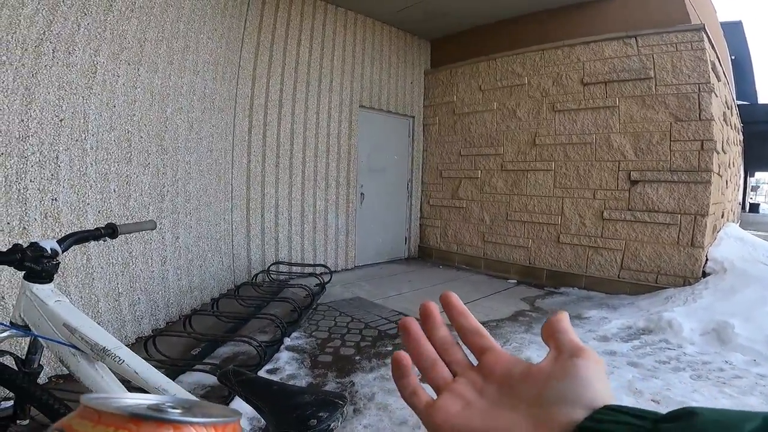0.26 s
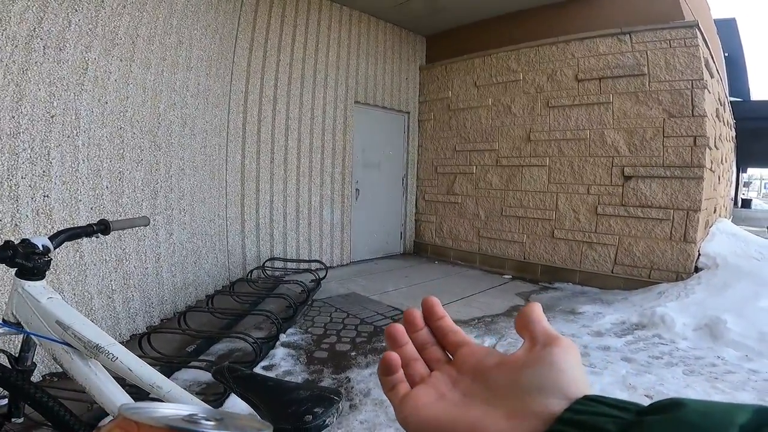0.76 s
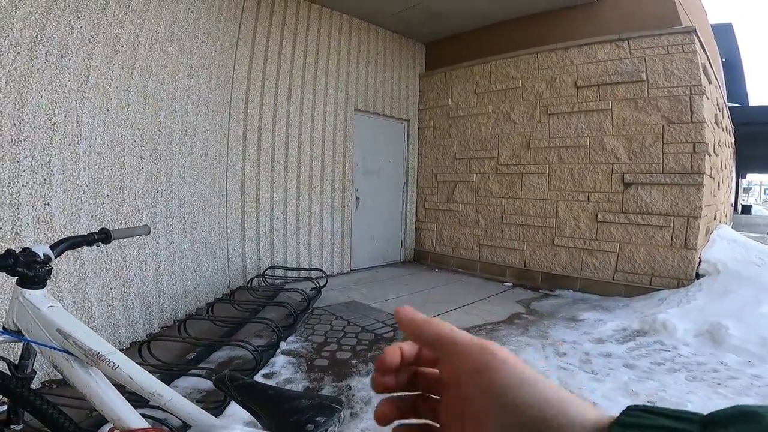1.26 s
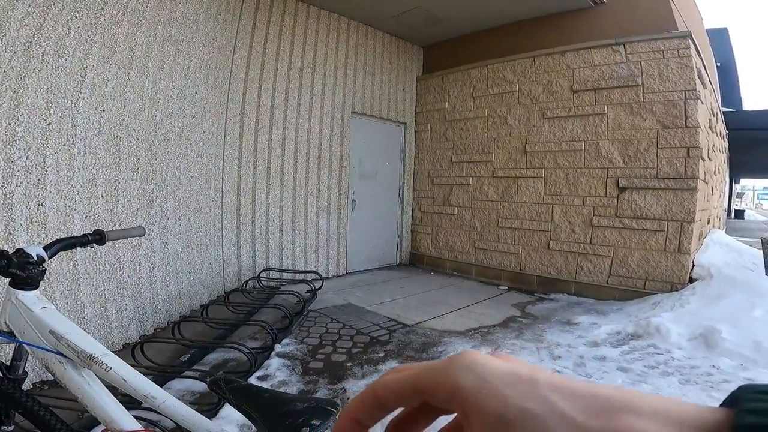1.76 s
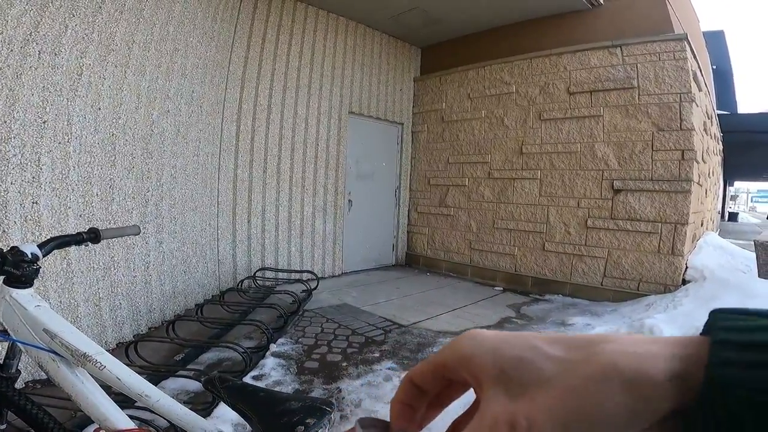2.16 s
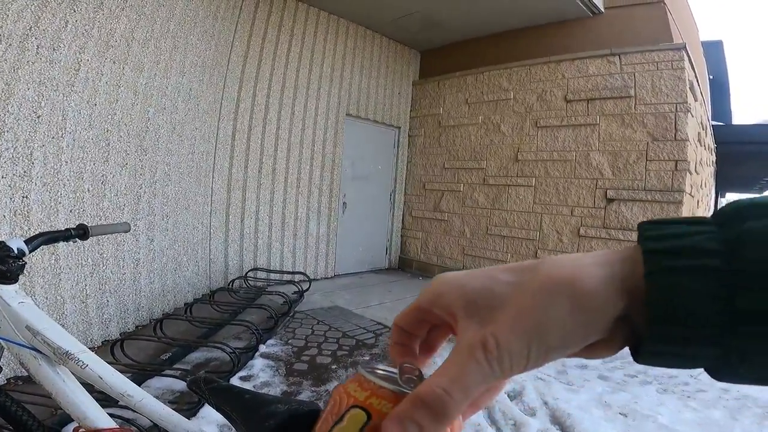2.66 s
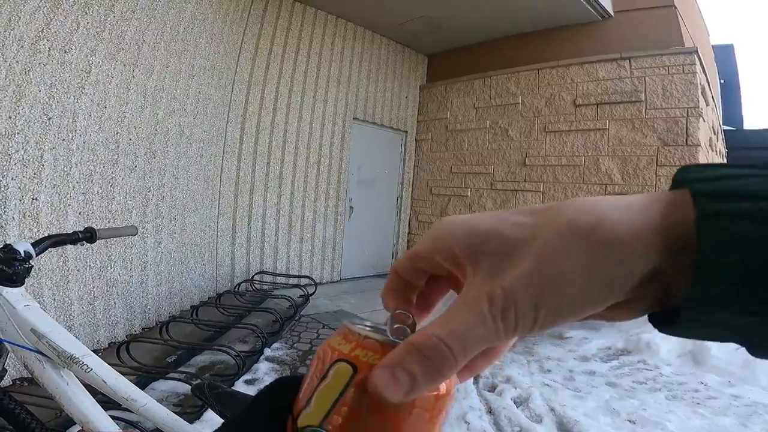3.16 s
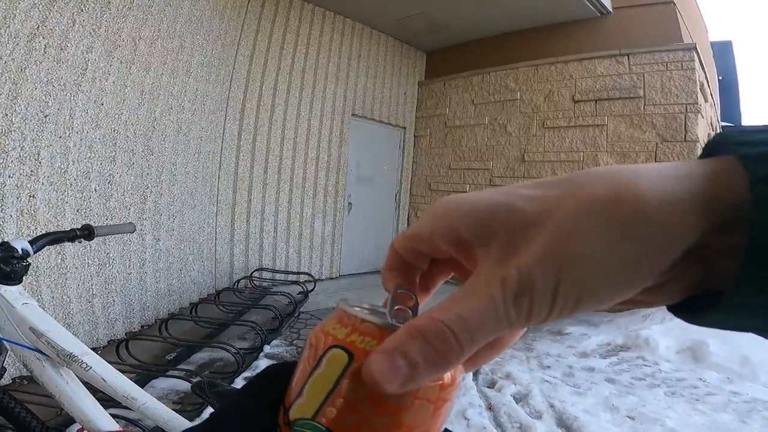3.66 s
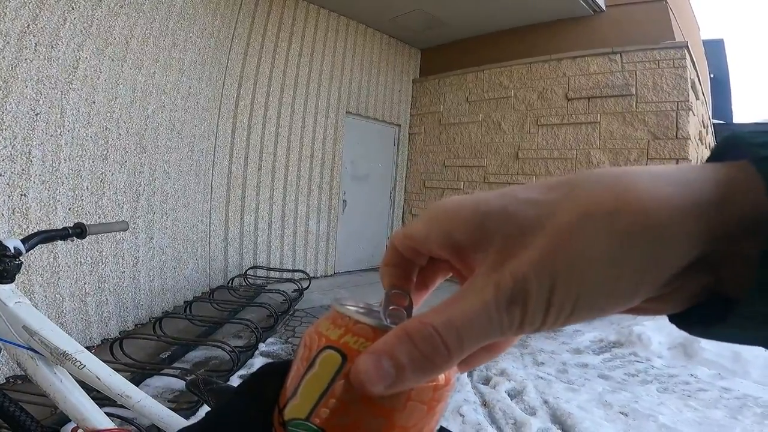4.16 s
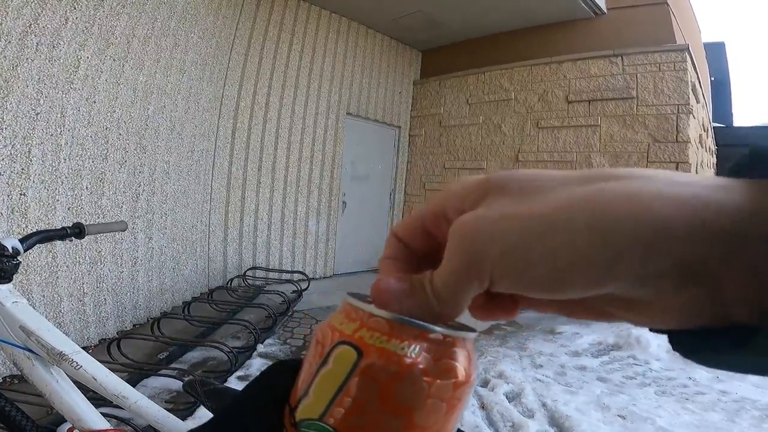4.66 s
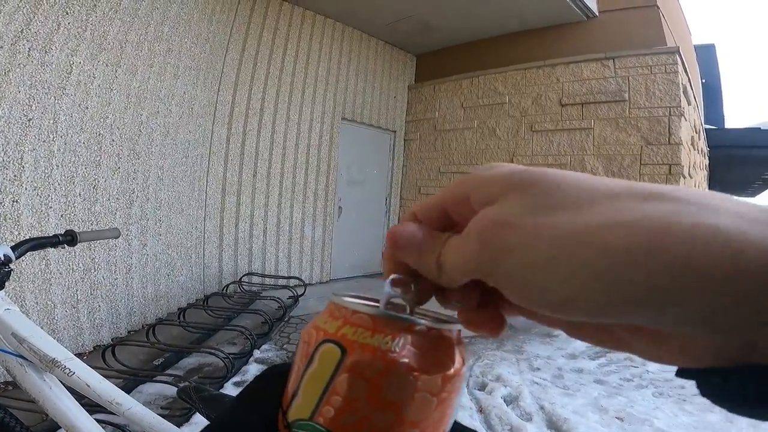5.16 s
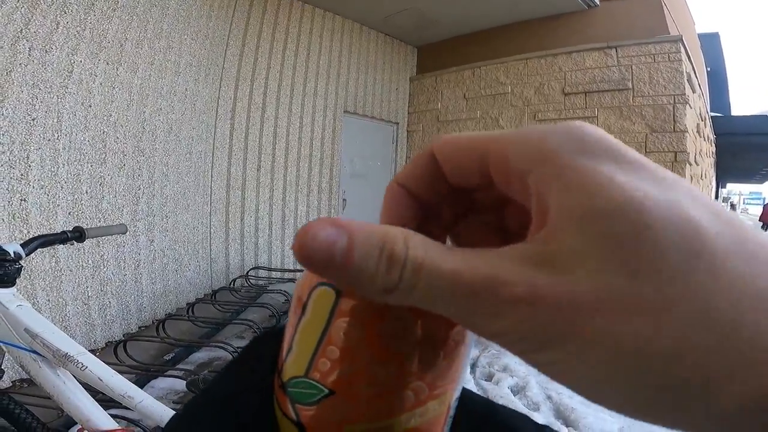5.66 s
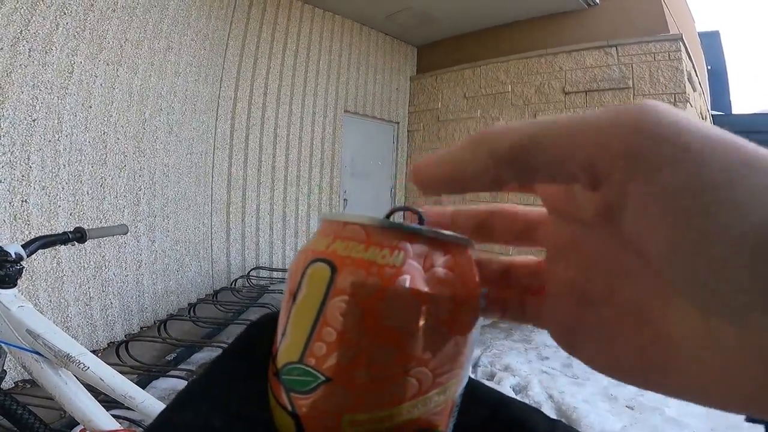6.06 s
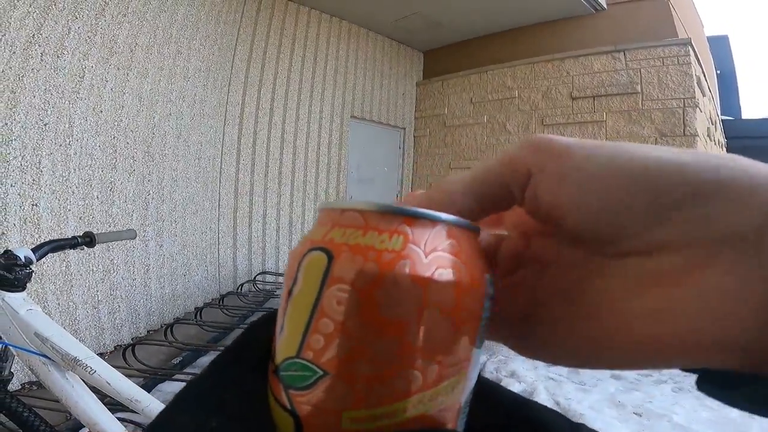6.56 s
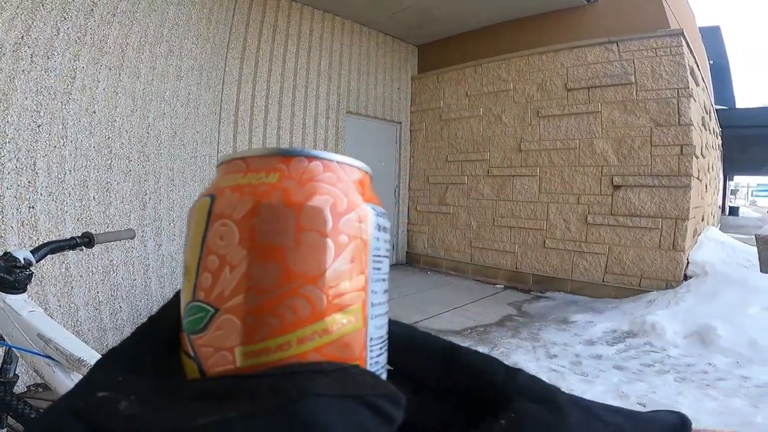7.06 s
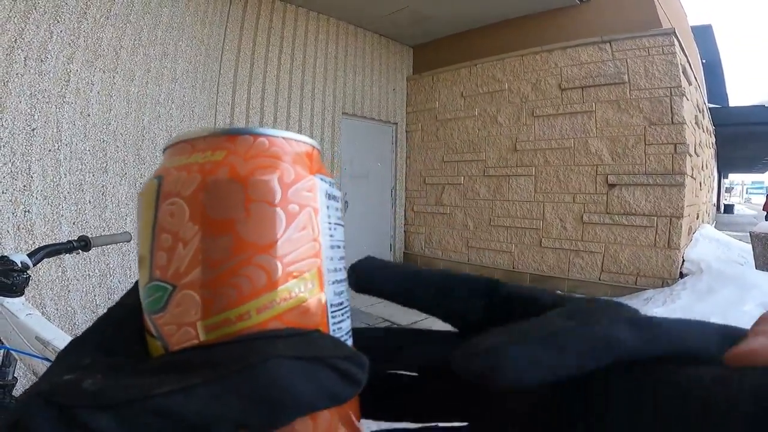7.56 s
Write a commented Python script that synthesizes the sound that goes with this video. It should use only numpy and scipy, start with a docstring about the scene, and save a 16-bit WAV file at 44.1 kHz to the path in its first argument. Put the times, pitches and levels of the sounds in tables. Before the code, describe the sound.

Close metallic tab snaps on a drink can, a sharp gas spit and cracks, then a loud pop, short fizz and small plinks outdoors.

```python
"""Opening a drink can outdoors

A fingernail snaps the tab of a can close to the microphone; knocks on its housing are heard too.
Gas spits out as noise, the score line cracks, and the lid tears open with a pop: ringing metal modes.
Foam fizzes as tiny bubbles, then the tab is bent back and rings the air space and the loosened lid.
Behind are wind rumble, town noise and a motor's hum, a thin far squeal, rustling cloth and wall echoes."""
import sys
import numpy as np
from scipy import signal
from scipy.fft import rfft, irfft
from scipy.io import wavfile

SR = 44100
rng = np.random.default_rng(int(sys.argv[2]) if len(sys.argv) > 2 else 0)


def wrap_up_sound(samples):
    """Save the sound to the file named by the first command line argument, as 16-bit audio."""
    columns = np.atleast_2d(samples).T
    # keep every value between -1 and 1, then stretch to whole-number steps
    tamed = np.clip(columns, -1, 1)
    steps = np.round(tamed * 32767).astype(np.int16)
    wavfile.write(sys.argv[1], SR, steps)


N = 343980
TIME = np.arange(N) / SR   # the whole scene, s
HIT_TIME = np.arange(SR // 4) / SR   # one short hit, s


def from_db(db):
    """Turn decibels into gain."""
    return 10 ** (np.asarray(db) / 20)


def rms_one(x):
    """Scale to unit power."""
    return x / np.sqrt(np.mean(x ** 2) + 1e-20)


def unit_hit(x):
    """Scale a hit to the energy of ten milliseconds at unit power."""
    return x / np.sqrt(np.sum(x ** 2) / (SR / 100) + 1e-20)


def level(rows):
    """Make a gain curve from rows that start with t/s and end with level/dB."""
    rows = np.array(rows)
    return from_db(np.interp(TIME, rows[:, 0], rows[:, -1]))


def cut(x, hz, kind, order=2):
    """Filter away what lies above ("low") or below ("high") a pitch."""
    sos = signal.butter(order, min(hz, .45 * SR), kind, fs=SR, output="sos")
    return signal.sosfilt(sos, x)


def smooth(x, s):
    """Follow a signal sluggishly, with a time constant in seconds."""
    r = np.exp(-1 / (s * SR))
    return signal.lfilter([1 - r], [1, -r], x)


def drift(rate, size=N):
    """Wander at random through `rate` new values a second, with unit power."""
    knots = rng.standard_normal(int(size / SR * rate) + 2)
    return rms_one(np.interp(TIME[:size] * rate, np.arange(len(knots)), knots))


def noise(colour, side_db):
    """Make stereo noise with the given spectrum and its own left-right difference (side) part."""
    hz, db = np.transpose(colour)
    log_hz = np.log(np.fft.rfftfreq(N, 1 / SR) + 0.0014)
    # the spectrum falls steeply outside its table
    beyond = np.maximum(np.log(hz[0]) - log_hz, 0) + np.maximum(log_hz - np.log(hz[-1]), 0)
    gain = from_db(np.interp(log_hz, np.log(hz), db) - 40 * beyond)
    mid, side = irfft(rfft(rng.standard_normal((2, N))) * gain, N)
    return rms_one(mid + from_db(side_db) * side * [[1], [-1]])


def narrow_band(hz, width_hz):
    """Make a breathy tone: noise gathered around a pitch that may move."""
    phase = 2 * np.pi * np.cumsum(hz * np.ones(N)) / SR
    return rms_one(drift(width_hz) * np.sin(phase) + drift(width_hz) * np.cos(phase))


def ringing(modes, tilt_db=0, pitch=1, length=1, scatter_db=0, detune=0):
    """Add dying tones of alternating sign; strengths (tilted per octave) and pitches may vary by chance."""
    out = 0
    for k, (hz, db, t60) in enumerate(modes):
        strength_db = db + tilt_db * np.log2(hz / modes[0][0]) + scatter_db * rng.standard_normal()
        phase = 2 * np.pi * hz * pitch * (1 + detune * rng.standard_normal()) * HIT_TIME
        gain = from_db(strength_db - 60 * HIT_TIME / (t60 * length))
        out = out + (-1) ** k * gain * np.sin(phase)
    return unit_hit(out)


def crack(t60, low_hz, high_hz):
    """Make the brief rattle of a contact: dying noise between two pitches."""
    rattle = rng.standard_normal(len(HIT_TIME)) * from_db(-60 * HIT_TIME / t60)
    return unit_hit(cut(cut(rattle, low_hz, "high"), high_hz, "low"))


def grains(per_s, spread_db):
    """Scatter random clicks of uneven size and sign."""
    sizes = from_db(spread_db * np.minimum(rng.exponential(1, N), 4)) * rng.choice([-1, 1], N)
    return sizes * (rng.random(N) < per_s / SR)


def add(out, s, hit, db, pan_db=0):
    """Place a hit in stereo; a positive pan makes the left louder."""
    i = round(s * SR)
    out[:, i:i + len(hit)] += from_db([[db + pan_db / 2], [db - pan_db / 2]]) * hit[:N - i]


def burst(s, db, hold_s, rise_db_per_s, fall_db_per_s):
    """Make a gain that rises to its level at s, holds and dies away."""
    early = np.maximum(s - TIME, 0)
    late = np.maximum(TIME - s - hold_s, 0)
    return from_db(np.maximum(db - rise_db_per_s * early - fall_db_per_s * late, -200))


def swells(rows):
    """Make the gain of smooth bell-shaped movements, added in power."""
    power = 0
    for s, db, half_s in rows:
        power = power + from_db(db) ** 2 * np.exp(-2 * np.minimum(((TIME - s) / half_s) ** 2, 20))
    return np.sqrt(power)


WALL_T60_S, WALL_DB = .55, -27.5   # dying time and level of the can's wall echoes


def walls(x, gap_s=0.0088, build_s=0.0075, dull_hz=8000, side_db=-6):
    """Scattered echoes build up between the walls; their treble dies first."""
    t = np.arange(SR) / SR
    mid, side = rng.standard_normal((2, SR))
    echoes = mid + from_db(side_db) * side * [[1], [-1]]
    swell = 1 - np.exp(-np.maximum(t - gap_s, 0) / build_s)
    dying = from_db(-60 * t / WALL_T60_S)
    bass = cut(echoes, dull_hz, "low", order=3)
    treble = .9 * np.sqrt(dying) * cut(echoes, dull_hz, "high", order=3)
    tail = swell * dying * (bass + treble)
    tail = tail / np.sqrt(np.sum(tail ** 2) / 2)
    return signal.fftconvolve(x[None], tail, axes=1)[:, :N]


# ground and nearest walls: (delay t/s, level/dB relative)
NEAR_ECHOES = [(.008, -24), (.019, -28.5), (.033, -26.5), (.042, -27.5)]


def near_echoes(x, smear_s=0.035, dull_hz=7500):
    """The ground and the nearest rough walls each return a slightly smeared copy."""
    response = np.zeros((2, N))
    for s, db in NEAR_ECHOES:
        scatter = crack(t60=smear_s, low_hz=800, high_hz=dull_hz)
        add(response, s, scatter / np.abs(rfft(scatter)).max() * 2, db)
    return signal.fftconvolve(x[None], response[:, :len(HIT_TIME)], axes=1)[:, :N]


# a distant motor swells and fades: (t/s, level/dB relative, only the change counts)
MOTOR_SWELL = [(0.0, -51.5), (0.46, -39), (0.93, -46.5), (1.19, -46.5), (1.63, -35.5), (2.35, -40.5),
               (3.3, -48.5), (3.67, -43), (3.89, -51), (5.8, -57), (6.02, -54), (6.3, -63), (7.43, -54),
               (7.8, -52)]


def motor_swell():
    """Tell how far the distant motor is below its loudest, in dB."""
    s, db = np.transpose(MOTOR_SWELL)
    return np.interp(TIME, s, db - db.max())


# steady tones of the motor: (f/Hz, level/dB relative to one another)
HUM_LINES = [(161.5, -38), (242.2, -54), (323.0, -58), (355.3, -56), (404.2, -52)]
HUM_DB, HUM_SWING = -32.5, 0.88   # strongest line at the motor's loudest; share of the swell it follows


def hum(waver_hz=0.9, flutter_db=1.0, lag_s=0.00012):
    """Motor tones waver on their way through the open air and reach the left first."""
    top_db = max(db for hz, db in HUM_LINES)
    lag = lag_s * np.array([[0], [1]])
    lines = 0
    for hz, db in HUM_LINES:
        phase = 2 * np.pi * (np.cumsum(hz + waver_hz * drift(9)) / SR - hz * lag)
        lines = lines + from_db(db - top_db + flutter_db * drift(7.8)) * np.sin(phase)
    return from_db(HUM_DB + HUM_SWING * motor_swell()) * lines


# strength of the breeze: (t/s, level/dB before the lift WIND_DB)
WIND = [(0.0, -38), (2.5, -42), (2.76, -39), (5.6, -42.5), (6.89, -42), (7.23, -36), (7.8, -39)]
# arm movements jostle the microphone: (t/s, level/dB, half length t/s)
JOSTLES = [(1.04, -34, 0.062), (2.2, -38.5, 0.24), (4.25, -30, .04), (5.05, -26, 0.063),
           (6.38, -31.5, 0.062), (6.57, -33.5, 0.039), (7.73, -35, .02)]
# spectrum of the rumble: (f/Hz, level/dB relative)
WIND_COLOUR = [(15, -12), (25, 0), (33, 3), (43, -2.5), (55, -8), (80, -6), (100, -12.5), (140, -14),
               (200, -25)]
WIND_DB, GUST_DB, GUSTS_PER_S = 3.5, 0.84, 5.3   # lift; size and rate of the random gusts


def wind():
    """Gusts and jostling shake the microphone into a low rumble of noise."""
    breeze = level(WIND) * from_db(WIND_DB + GUST_DB * drift(GUSTS_PER_S))
    return np.hypot(breeze, swells(JOSTLES)) * noise(WIND_COLOUR, side_db=-27.5)


# spectrum of the town: (f/Hz, level/dB relative)
TOWN_COLOUR = [(90, -14), (140, 2), (230, -2.5), (400, -5.5), (600, -18), (1000, -24.5), (2000, -28),
               (3500, -38.5), (7000, -49), (14000, -64)]
TOWN_DB, TOWN_SWING = -42, .12   # level at its loudest; its share of the motor's swell


def town():
    """A wash of noise follows the motor's swell a little; long waves reach both sides alike."""
    wash = from_db(TOWN_DB + TOWN_SWING * motor_swell()) * noise(TOWN_COLOUR, side_db=-7.0)
    mid = wash.mean(axis=0)
    return mid + cut(wash - mid, 500, "high", order=1)


# strokes of the sleeve and glove: (t/s, level/dB before a 3 dB lift, half length t/s)
SLEEVE = [(.02, -47.5, 0.11), (.4, -61, 0.33), (1.39, -55.5, 0.15), (2.1, -56, 0.51), (2.44, -50, 0.19),
          (3.1, -58.5, 0.36), (4.5, -65, 0.12), (4.85, -62.5, 0.19), (5.68, -57, 0.12), (5.88, -57, 0.071),
          (6.7, -61.5, 0.56), (7.46, -55.5, 0.068), (7.60, -49, 0.03), (7.75, -58, 0.49)]
# spectrum of the rubbing cloth: (f/Hz, level/dB relative)
SLEEVE_COLOUR = [(400, -2.5), (900, 4), (1800, 1.5), (3000, -2.5), (5000, -6.5), (7500, -11),
                 (10000, -20.5), (12200, -18.5), (15000, -31)]
SLEEVE_REST_DB = -67.5   # cloth stirring between strokes, before the same lift


def sleeve():
    """Cloth rubs nearby: noise swells with each stroke and flickers quickly."""
    strokes = np.hypot(from_db(SLEEVE_REST_DB), swells(SLEEVE))
    flicker = from_db(3 + 1.7 * drift(120))
    return strokes * noise(SLEEVE_COLOUR, side_db=0.0) * flicker


# a thin far squeal, one table a note: (t/s, f/Hz, level/dB before flutter and a 1.5 dB cut)
SQUEALS = [
    [(0.308, 4660, -72), (0.32, 4650, -55), (0.38, 4645, -50.5), (0.44, 4660, -50), (0.5, 4670, -54),
     (0.57, 4640, -72)],
    [(0.39, 4690, -58), (0.435, 4740, -45.5), (0.48, 4780, -39), (0.52, 4760, -47), (0.585, 4780, -48),
     (0.612, 4788, -41.5), (0.665, 4790, -41.5), (0.692, 4760, -54.5), (0.735, 4775, -48),
     (0.775, 4710, -62), (0.815, 4780, -52), (0.88, 4765, -60), (0.92, 4745, -70), (1.0, 4760, -80)],
    [(1.99, 5470, -63), (2.045, 5520, -64), (2.065, 5530, -54), (2.12, 5540, -60), (2.21, 5620, -62),
     (2.24, 5590, -74)],
]


def squeals(waver_hz=10, octave_db=-25, echo_db=-8):
    """Nearly pure, fluttering notes with a faint octave beat against their echoes as the pitch moves."""
    out = 0
    for note in SQUEALS:
        s, hz, db = np.transpose(note)
        phase = 2 * np.pi * np.cumsum(np.interp(TIME, s, hz) + waver_hz * drift(160)) / SR
        sounding = (TIME > s[0]) * (TIME < s[-1])
        loudness = level(note) * sounding * from_db(-1.5 + 2 * drift(70))
        out = out + loudness * (np.sin(phase) + from_db(octave_db) * np.sin(2 * phase))
    return out + from_db(echo_db) * walls(out)


# dull knocks on the microphone housing:
# (t/s, level/dB, left over right level/dB, softness cut-off f/Hz, tick level/dB relative)
THUMPS = [(0.391, -34.5, -12, 1300, -24), (0.9958, -31, 7, 945, -35), (3.678, -19.5, -12.5, 900, -27),
          (3.7626, -18.5, -13, 1010, -28), (4.252, -32.5, -1, 600, -30), (4.278, -32.5, -1, 400, -33),
          (4.9960, -18.5, 9, 260, -40), (7.732, -33, 0, 500, -36)]


def thumps(body_hz=100):
    """A soft pulse spreads in the housing, its lows arriving last."""
    r = np.exp(-2 * np.pi * body_hz / SR)
    pulse = -np.exp(-2 * np.pi * body_hz * HIT_TIME)
    for _ in range(3):   # each pass delays the lows more than the highs
        pulse = signal.lfilter([r, -1], [1, -r], pulse)
    out = np.zeros((2, N))
    for s, db, pan_db, soft_hz, tick_db in THUMPS:
        tick = crack(t60=0.006, low_hz=1300, high_hz=5500)
        hit = unit_hit(cut(pulse, soft_hz, "low")) + from_db(tick_db) * tick
        add(out, s, hit, db, pan_db)
    return out


# the tab slips off the nail onto the lid: (t/s, level/dB, brightness level/dB per octave,
# lid flex level/dB relative, flex f/Hz, crack level/dB relative, tab pitch as a factor)
TAB_SNAPS = [(1.768, -47.5, 5, -1, 1760, -5, 1.17), (2.2783, -44.5, -2, 8, 1995, -14, 1),
             (2.3765, -39, -13.5, -15, 2410, -20, 1.01), (2.4055, -39.5, -5, -28, 2400, -26, 1.06),
             (2.417, -40.5, -4, -24.5, 2403, -20, 1), (2.4278, -41.5, -3, -19.5, 2392, -18, 1.06),
             (2.45, -48, 0, -22, 2400, -14, 1.06), (2.552, -20.5, 4.5, -16, 2698, -14, 1.02),
             (3.0444, -14.5, -5, -7, 1743, -4, .98), (3.0515, -35, 6, -12, 1760, 0, 1.1)]
# the tab's own tones: (f/Hz, level/dB relative, time to fall 60 dB t/s)
TAB_MODES = [(3340, -8.5, 0.0058), (3760, 1, 0.0096), (4060, 3.5, 0.0073), (4445, 1.5, 0.009),
             (5300, -9, .004), (6250, -8, 0.0065), (8300, -27, .012), (10000, -19, 0.005),
             (12000, -19.5, .004)]
# the flexing lid, moved to the flex pitch above: (f/Hz, level/dB relative, time to fall 60 dB t/s)
FLEX_MODES = [(1830, 6.5, .008), (1340, 3, 0.004)]


def tab():
    """The finger-damped tab rings for a few cycles, flexes the lid and leaves the shell buzzing."""
    out = np.zeros((2, N))
    for s, db, tilt_db, flex_db, flex_hz, crack_db, pitch in TAB_SNAPS:
        metal = ringing(TAB_MODES, tilt_db, pitch)
        flex = ringing(FLEX_MODES, pitch=flex_hz / FLEX_MODES[0][0])
        # a short smoothing softens the blow
        hit = unit_hit(signal.lfilter(np.hanning(5), 1, metal + from_db(flex_db) * flex))
        hit = hit + from_db(crack_db) * crack(t60=0.0055, low_hz=3500, high_hz=8900)
        hit = hit + from_db(-15.5) * crack(t60=0.05, low_hz=2600, high_hz=6000)   # shell buzz
        add(out, s, unit_hit(hit), db)
    # the sound reaches the right side one sample later
    return np.array([out[0], np.roll(out[1], 1)])


# gas spits through the breaks in the seal: (t/s, level/dB, hold t/s)
GAS = [(2.696, -21.5, 0.075), (4.244, -46, .004), (4.996, -34, .004)]
# spectrum of the jet: (f/Hz, level/dB relative)
GAS_COLOUR = [(290, -54.5), (500, -21.5), (545, -17.5), (815, -18.5), (1220, -13.5), (1700, -18.5),
              (1930, -9), (2160, -21.5), (3530, -4.5), (5130, -6), (5830, -3), (8480, -2.5), (11100, -11),
              (12300, -7.5), (15500, -26.5)]
# the slit and lid colour the jet: (f/Hz, level/dB relative)
JET_RESONANCES = [(3550, -4), (5845, 1), (6460, 0), (8390, -1), (10115, -3), (12135, -5)]
# the narrow leak whistles: (t/s, level/dB, hold t/s)
LEAK = (4.228, -55.5, 0.05)
GAS_RISE_DB_PER_S, GAS_FALL_DB_PER_S = 1301, 600.5
JET_Q, JET_RING_DB = 60, -7   # sharpness of the resonances; their level against the noise
LEAK_HZ, LEAK_Q, LEAK_RISE_DB_PER_S, LEAK_FALL_DB_PER_S = 4600, 24, 602, 400


def gas(sputter_db=1.45):
    """A wet, sputtering jet of noise rings the slit; a narrow leak whistles breathily."""
    flow = sum(burst(*row, GAS_RISE_DB_PER_S, GAS_FALL_DB_PER_S) for row in GAS)
    white = rng.standard_normal(N)
    rings = 0
    for hz, db in JET_RESONANCES:
        rings = rings + from_db(db) * signal.lfilter(*signal.iirpeak(hz, JET_Q, fs=SR), white)
    hiss = noise(GAS_COLOUR, side_db=-7) + from_db(JET_RING_DB) * rms_one(rings)
    jet = flow * rms_one(hiss * from_db(sputter_db * drift(290)))
    whistle = signal.lfilter(*signal.iirpeak(LEAK_HZ, LEAK_Q, fs=SR), rng.standard_normal(N))
    return jet + burst(*LEAK, LEAK_RISE_DB_PER_S, LEAK_FALL_DB_PER_S) * rms_one(whistle)


# the score line gives in small cracks: (t/s, level/dB, brightness level/dB per octave,
# left over right level/dB, lid pitch as a factor, flap level/dB relative, flap f/Hz, rattle level/dB relative)
CRACKS = [(3.6707, -27, -0.5, -4, 1.015, -26, 3170, -6.5), (3.796, -29, -5.5, -6, 1, -20, 3180, -7),
          (3.799, -31, 2.5, 6, 0.98, -13, 3180, -3), (3.8150, -23.5, -1.5, -4.5, 1, -17, 3150, -8),
          (3.8677, -22.5, 5, -5, 1, -18, 3320, -4.5), (3.8741, -28, -5.5, -2, 1.02, 0, 3210, -4),
          (3.886, -35, -9, -3, .985, -1, 3160, -3), (4.226, -43.5, -2, 8, 1.03, -1, 2350, -1),
          (4.2440, -30.5, -2, 4, 1.08, -8, 2450, 0), (4.4400, -60.5, 12, -3, 1.03, -15, 2400, 3),
          (4.585, -56, -24, -2, 1, -2, 2410, -6)]
# the lid's tones: (f/Hz, level/dB relative, time to fall 60 dB t/s)
LID_MODES = [(600, -27.5, 0.04), (1350, -9.5, 0.0032), (1960, -1, 0.0046), (2500, -8.5, .008),
             (3450, -17, 0.02), (3970, -1, 0.013), (5290, -6, 0.014), (6040, 0, 0.023), (6960, -5, 0.022),
             (7400, -7.5, 0.016), (8530, -15, 0.0071), (9900, -18.5, 0.016), (11300, -31, .01),
             (12400, -22, .008)]
# the loosening flap, moved to the flap pitch above: (f/Hz, level/dB relative, time to fall 60 dB t/s)
FLAP_MODES = [(3180, 0, .028), (3480, 3, .016)]


def score_cracks():
    """Each small fracture rings the lid, whose pitch shifts with its tension, and the loosening flap."""
    out = np.zeros((2, N))
    for s, db, tilt_db, pan_db, pitch, flap_db, flap_hz, rattle_db in CRACKS:
        lid = ringing(LID_MODES, tilt_db, pitch, scatter_db=1.5, detune=0.003)
        flap = ringing(FLAP_MODES, pitch=flap_hz / FLAP_MODES[0][0], detune=0.006)
        rattle = crack(t60=0.022, low_hz=710, high_hz=6540)
        hit = lid + from_db(flap_db) * flap + from_db(rattle_db) * rattle
        add(out, s, unit_hit(hit), db, pan_db)
    return out


# fingertips and glove drag over the can:
# (t/s, level/dB before the stroke's fade, length t/s, centre f/Hz, slips per s, half width in octaves)
SCRAPES = [(4.227, -51, 0.025, 6000, 3900, 0.97), (4.245, -48.5, 0.061, 1800, 3500, .5),
           (4.246, -49, 0.073, 900, 3500, .3), (4.248, -52, 0.04, 6500, 3500, 0.51),
           (6.395, -50.5, 0.053, 2800, 700, .7), (7.428, -42, 0.023, 1400, 900, 0.47),
           (7.437, -46, 0.08, 1670, 540, 0.16), (7.428, -54, 0.071, 4270, 600, 0.3),
           (7.568, -52.5, 0.055, 4100, 600, 0.23), (7.586, -45.5, 0.05, 1600, 600, 0.55),
           (7.602, -44, 0.023, 4100, 700, .2), (7.733, -59, 0.031, 6000, 1150, .9)]


def scrapes():
    """Skin and cloth stick and slip: a quick swell of gritty grains that fades with the stroke."""
    out = np.zeros((2, N))
    for s, db, length, hz, per_s, half_octaves in SCRAPES:
        spread = 2 ** half_octaves
        slips = grains(per_s, spread_db=2.0)[:len(HIT_TIME)]
        grit = rms_one(cut(cut(slips, hz / spread, "high", order=3), hz * spread, "low", order=5))
        stroke = np.minimum(HIT_TIME / (0.19 * length), 1) * np.exp(-2 * (HIT_TIME / length) ** 2)
        add(out, s, grit * stroke, db)
    return out


# the lid tears along its score until the flap gives: (start t/s, break t/s, level/dB at the break)
TEAR = (4.948, 4.997, -15.5)
# the can as it opens: (f/Hz, level/dB relative before damping, damping time t/s)
CAN_MODES = [(695, -7, .08), (1200, -7.5, .05), (1700, -9, .02), (3085, -5, .03), (3618, 1, .06),
             (5030, -2, .07), (8387, -12, .03), (1950, -11, .02), (2600, -8, .02), (3350, -4, .04),
             (4050, -5, .012), (4380, -3, .022), (6400, -13, .015), (7150, -7, .04), (9400, -14, .03),
             (10940, -20, .03)]
TEAR_RISE_DB, TEAR_GROWTH = 49.5, 2.1   # size of the swell and its curvature
TEAR_SLACK_DB, TEAR_FALL_DB_PER_S = -21.5, 600   # drop as the lid goes slack; dying away


def tearing(rip_db=-8.0, rip_top_hz=7000, flutter_db=2.5, waver_cycles=1.3):
    """A run of tiny fractures keeps the can's modes singing ever louder until the lid goes slack."""
    size, body = len(HIT_TIME), 0
    for hz, db, t60 in CAN_MODES:
        # lightly damped modes build up more and hold their pitch better
        phase = 2 * np.pi * np.cumsum(hz + waver_cycles / t60 * drift(300, size=size)) / SR
        strength = np.sqrt(t60) * from_db(db + flutter_db * drift(200, size=size))
        body = body + strength * np.sin(phase)
    rip = rms_one(cut(grains(per_s=7000, spread_db=1.5)[:size], rip_top_hz, "low"))
    tear = rms_one(cut(rms_one(body) + from_db(rip_db) * rip, 470, "high", order=3))
    length = TEAR[1] - TEAR[0]
    growing = from_db(-TEAR_RISE_DB * np.maximum(1 - HIT_TIME / length, 0) ** TEAR_GROWTH)
    slack = from_db(TEAR_SLACK_DB - TEAR_FALL_DB_PER_S * (HIT_TIME - length))
    return np.where(HIT_TIME < length, growing, slack) * tear


# the flap breaks through and settles: (t/s, level/dB, brightness level/dB per octave)
POPS = [(4.983, -22, 7.5), (4.9965, -14, -1), (4.9985, -21, -3), (5.0345, -39, 15)]
# tones of the breaking flap: (f/Hz, level/dB relative, time to fall 60 dB t/s)
POP_MODES = [(2720, -2.5, 0.0058), (3120, -3.5, .014), (3380, 0, 0.022), (3620, -4.5, 0.012),
             (4750, -1, 0.0071), (5850, -3, 0.0067), (7000, -4.5, 0.0045), (8650, -37.5, 0.27)]
# gas leaving the headspace: (f/Hz, level/dB relative, time to fall 60 dB t/s)
PUFF_MODES = [(640, 3, .012), (900, 2, 0.0098), (1090, 1, 0.0076)]
PUFF_S, PUFF_DB = 4.9965, -19.5   # when the headspace empties, and how loudly


def opening():
    """The lid tears, the flap rings and rattles as it breaks through, and the headspace puffs."""
    out = np.zeros((2, N))
    add(out, TEAR[0], tearing(), TEAR[2])
    for s, db, tilt_db in POPS:
        rattle = crack(t60=0.011, low_hz=800, high_hz=6800)
        add(out, s, unit_hit(ringing(POP_MODES, tilt_db) + from_db(-6) * rattle), db)
    puff = unit_hit(cut(ringing(PUFF_MODES), 500, "high"))
    add(out, PUFF_S, puff, PUFF_DB)
    return out


# foam under the opening: (t/s, level/dB, hold t/s)
FIZZ = (5.005, -45, 0.12)
# the last gas sighs through the opening: (t/s, level/dB, hold t/s)
SIGH = (5.005, -47.5, 0.15)
FIZZ_RISE_DB_PER_S, FIZZ_FALL_DB_PER_S = 2702, 111
SIGH_HZ, SIGH_WIDTH_HZ, SIGH_FALL_DB_PER_S = 3400, 560, 135
SPRAY_DB, SPRAY_FALL_DB_PER_S = -40.5, 130.5   # fine droplets thrown out by the pop


def foam():
    """Spray clicks, tiny bubbles burst at many pitches, the last gas sighs and the air space murmurs."""
    bubbles = 0
    for hz in np.geomspace(1100, 7500, num=15):
        clicks = grains(per_s=hz / 14, spread_db=2.0)
        bubbles = bubbles + signal.fftconvolve(clicks, ringing([(hz, 0, 9 / hz)]))[:N]
    fizz = burst(*FIZZ, FIZZ_RISE_DB_PER_S, FIZZ_FALL_DB_PER_S)
    fizz = fizz * rms_one(cut(bubbles, 7300, "low", order=6))
    sigh = burst(*SIGH, FIZZ_RISE_DB_PER_S, SIGH_FALL_DB_PER_S) * narrow_band(SIGH_HZ, SIGH_WIDTH_HZ)
    droplets = cut(grains(per_s=4300, spread_db=2.5), 1000, "high")
    spray = burst(FIZZ[0], SPRAY_DB, 0, FIZZ_RISE_DB_PER_S, SPRAY_FALL_DB_PER_S)
    spray = spray * rms_one(cut(droplets, 8000, "low", order=6))
    return fizz + sigh + gurgle() + spray


# the air space above the drink murmurs: (t/s, f/Hz, level/dB)
SLOSH = [(5.14, 760, -68), (5.165, 850, -58), (5.18, 1030, -52), (5.2, 900, -60), (5.24, 990, -53.5),
         (5.27, 949, -57), (5.308, 1056, -54), (5.33, 1082, -72)]
SLOSH_WIDTH_HZ = 230   # how fast the murmur's strength and phase wander


def gurgle():
    """A narrow, unsteady resonance of the air space wobbles upwards as the hand lifts."""
    s, hz, db = np.transpose(SLOSH)
    sounding = (TIME > s[0]) * (TIME < s[-1])
    return level(SLOSH) * sounding * narrow_band(np.interp(TIME, s, hz), SLOSH_WIDTH_HZ)


# the tab is bent to and fro on the open can: (t/s, level/dB, cavity f/Hz, rim level/dB relative,
# tick level/dB relative, ring length as a factor, most excited rim f/Hz, rim brightness level/dB per octave)
PLINKS = [(5.410, -56.5, 1000, 2, -10, .4, 2990, 0.5), (5.6036, -42.5, 940, -11, -20.5, 0.6, 3600, 0.5),
          (5.619, -44, 890, -15, -24, 0.41, 1690, -2), (5.687, -49.5, 1090, -10, -18, 0.6, 3300, 3),
          (5.7, -40, 1096, -10, -10, 0.6, 3300, 7), (5.8676, -28.5, 994, -31, -17, 0.48, 3650, 3),
          (6.1083, -26, 987, -7, -39, 0.99, 3650, -0.5), (6.148, -53, 976, -6, -35, .8, 3650, 0),
          (6.167, -47, 980, -13, -35, 0.8, 2300, 0), (6.2608, -57, 1050, 8, -9.5, .4, 2750, 2),
          (6.43, -50.5, 1110, -1.5, -18, 0.4, 2750, 3), (6.5568, -35, 1110, -3, -8.5, 0.34, 3060, 7),
          (6.7394, -44, 1070, -2, -15.5, 0.55, 2250, -3.5)]
# air under the opening, moved to the cavity pitch above: (f/Hz, level/dB relative, time to fall 60 dB t/s
# before the ring length factor)
CAVITY_MODES = [(983, -2, 0.065), (1100, -3, 0.013)]
# loosened lid: (f/Hz, level/dB relative before the touch boost, time to fall 60 dB t/s before that factor)
RIM_MODES = [(736, 0.5, 0.14), (1680, -9, 0.05), (2290, 2, 0.055), (2740, 1, 0.045), (3070, -3.5, 0.033),
             (3300, -7, .02), (3630, -6.5, 0.042)]
TOUCH_BOOST_DB, TOUCH_OCTAVES = 10.5, 0.097   # the place of contact favours neighbouring rim modes
RIM_TOP_HZ = 4200   # the soft fingertip excites little higher


def plinks():
    """The bending tab rings the air space and loosened lid; a hand over the opening shifts the air's pitch."""
    out = np.zeros((2, N))
    for s, db, hz, rim_db, tick_db, length, rim_hz, tilt_db in PLINKS:
        length = max(length, .1)
        air = ringing(CAVITY_MODES, pitch=hz / CAVITY_MODES[0][0], length=length)
        touched = []
        for f, mode_db, t60 in RIM_MODES:
            nearness = np.exp(-(np.log2(f / rim_hz) / TOUCH_OCTAVES) ** 2)
            touched.append((f, mode_db + TOUCH_BOOST_DB * nearness, t60))
        rim = ringing(touched, tilt_db, length=length, detune=0.004)
        tick = crack(t60=0.018, low_hz=3020, high_hz=6350)
        soft = cut(air + from_db(rim_db) * rim, RIM_TOP_HZ, "low", order=4)
        add(out, s, unit_hit(soft + from_db(tick_db) * tick), db)
    return out


SNAP_SHADED = .3   # share of the tab's near echoes that the hand blocks


def scene(snap_send_db=-18, crack_send_db=1, gas_send_db=-3):
    """Set the can with its echoes in front of the outdoor background."""
    lid, jet, snaps = score_cracks(), gas(), tab()
    rest = snaps + opening() + plinks() + foam() + scrapes()
    # each part throws its own share of sound towards the walls; the lid's share is a rough buzz
    thrown = from_db(crack_send_db) * lid * drift(900) + from_db(gas_send_db) * jet
    thrown = thrown + rest + from_db(snap_send_db) * snaps
    far = from_db(WALL_DB) * walls(thrown.mean(axis=0))
    near = near_echoes((lid + rest - SNAP_SHADED * snaps).mean(axis=0))
    background = squeals() + hum() + wind() + town() + sleeve()
    return lid + jet + rest + far + near + thumps() + background


GAIN_THRESHOLD_DB, GAIN_WINDOW_S, GAIN_ATTACK_S, GAIN_RELEASE_DB_PER_S = -19, .01, 0.048, 6


def gain_control(x):
    """A loud snap slips through, then the automatic gain ducks and creeps back."""
    level_db = 10 * np.log10(smooth(x.mean(axis=0) ** 2, GAIN_WINDOW_S) + 1e-12)
    recovery = GAIN_RELEASE_DB_PER_S * TIME
    excess_db = np.maximum(level_db - GAIN_THRESHOLD_DB, 0)
    duck_db = np.maximum.accumulate(excess_db + recovery) - recovery
    return x * from_db(-smooth(duck_db, GAIN_ATTACK_S))


# the stereo image closes and half reopens: (t/s, share of the left-right difference kept)
WIDTH = [(0, 0.73), (3.85, 0.86), (4.3, .05), (5.4, .03), (5.7, 0.12), (7.8, 0.48)]
CEILING = .88   # peaks are rounded towards this height
MIC_TOP_HZ, CUTOFF_HZ = 12100, 15800   # gentle roll-off; sharp cut


def record(dry):
    """The gain ducks after loud snaps, the image narrows, peaks are rounded, the top rolls off and is cut."""
    ducked = gain_control(dry)
    mid = ducked.mean(axis=0)
    narrowed = mid + (ducked - mid) * np.interp(TIME, *np.transpose(WIDTH))
    rounded = narrowed / (1 + (narrowed / CEILING) ** 4) ** (1 / 4)
    dulled = cut(rounded, MIC_TOP_HZ, "low")
    return signal.sosfilt(signal.ellip(10, .1, 80, CUTOFF_HZ, fs=SR, output="sos"), dulled)


dry = scene()
out = record(dry)
wrap_up_sound(out)
```